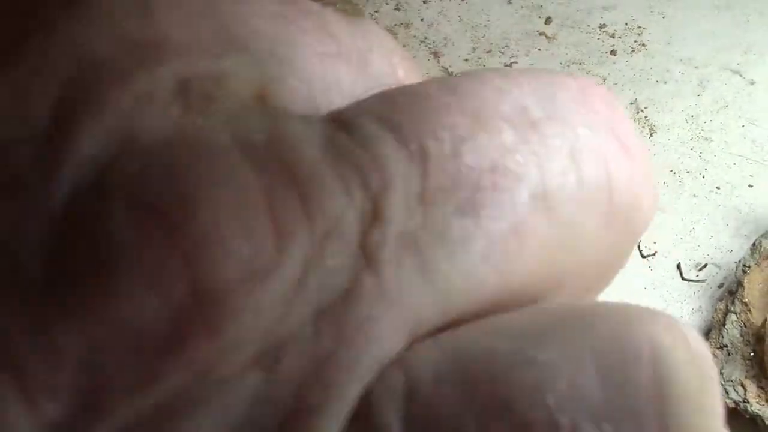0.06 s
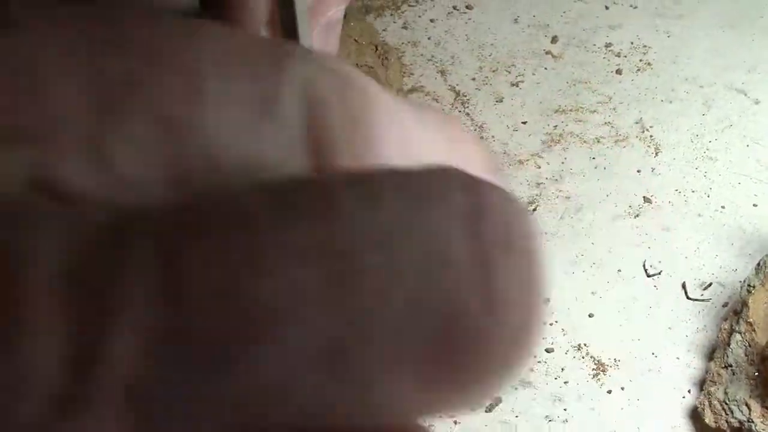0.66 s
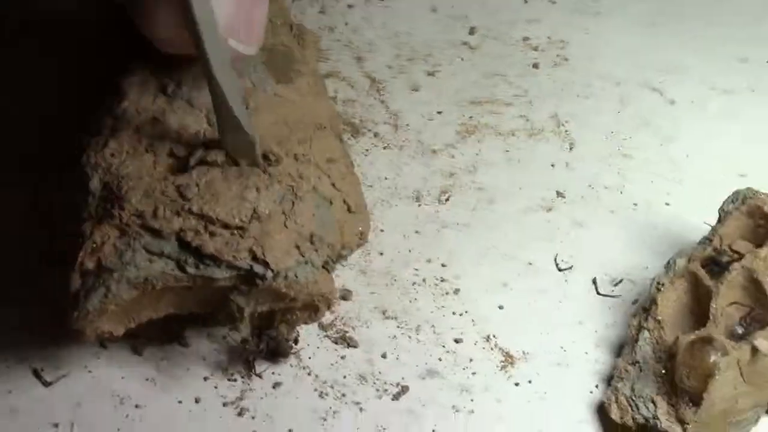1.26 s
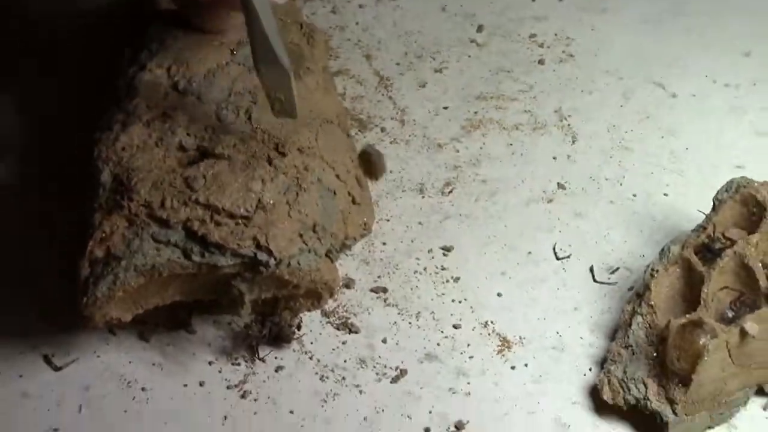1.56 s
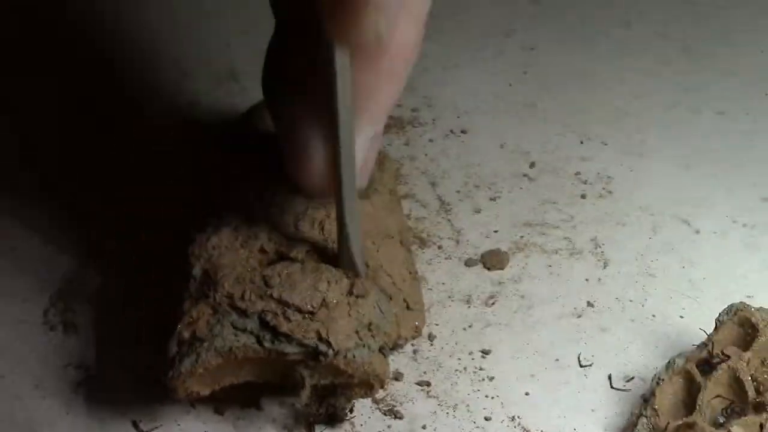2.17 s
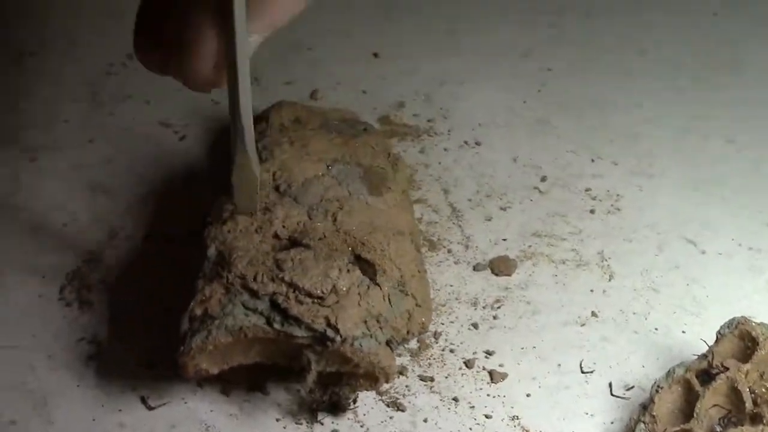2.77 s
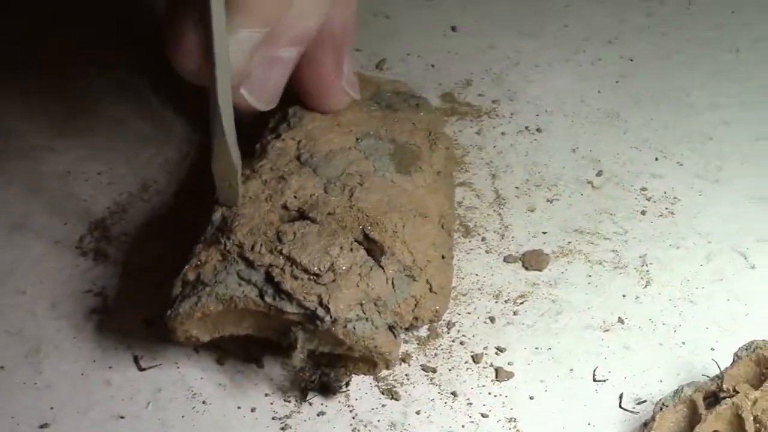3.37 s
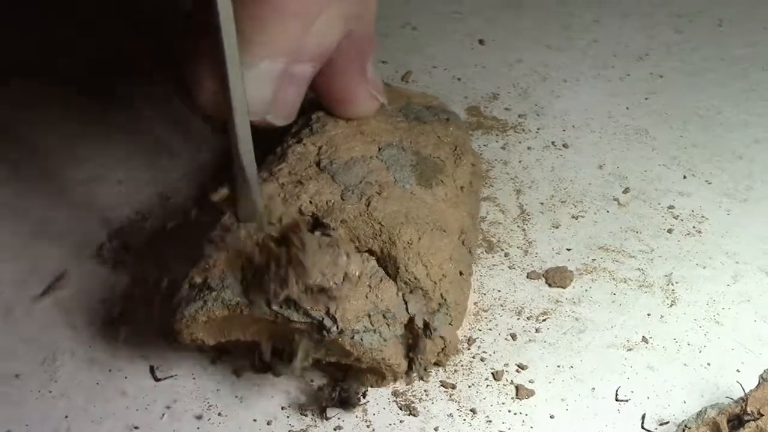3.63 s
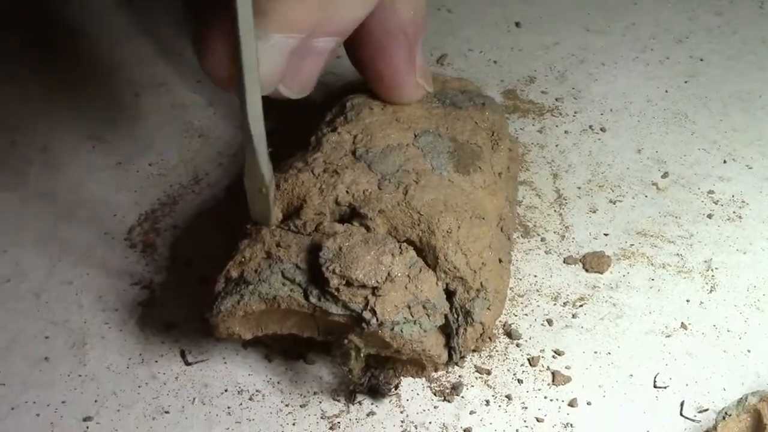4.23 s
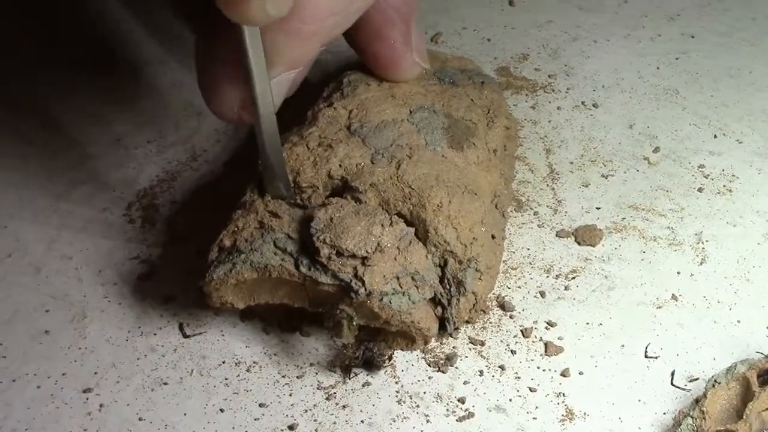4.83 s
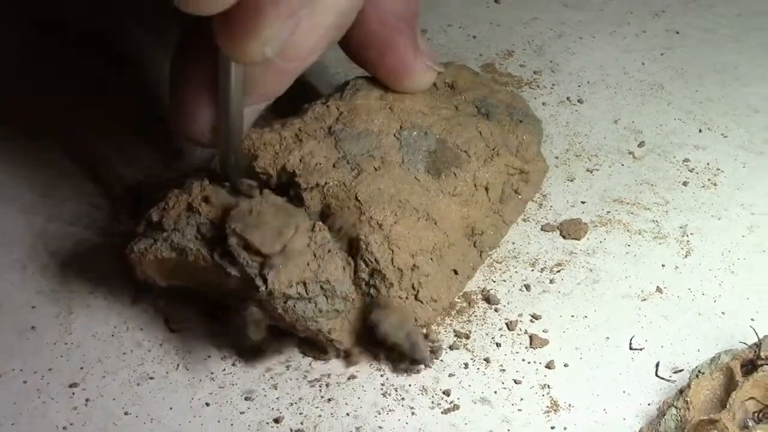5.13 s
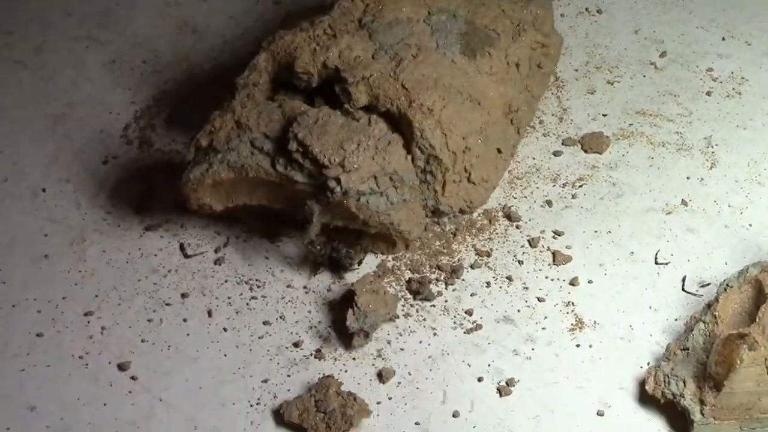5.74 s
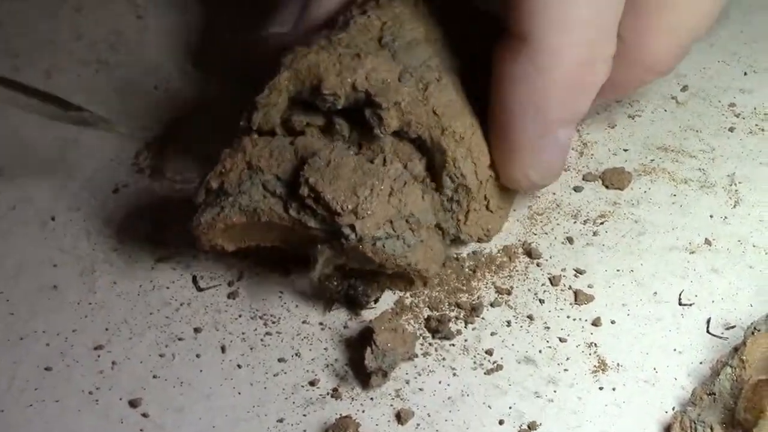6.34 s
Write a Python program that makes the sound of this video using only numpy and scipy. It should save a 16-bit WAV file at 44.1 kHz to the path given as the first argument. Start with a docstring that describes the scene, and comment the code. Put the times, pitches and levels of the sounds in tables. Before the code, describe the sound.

Close, crumbly cracks of dried clay being pried apart, with gritty scrapes, soft tabletop knocks and distant chirping birds.

```python
"""A dried mud nest cracks under a prying steel blade, close up on a table.
The clay gives way in showers of tiny fractures that hiss in the air and drum on the tabletop.
Blade and fingers scrape and rub; the nest knocks and drags over its own grit; crumbs drop.
Outside, a songbird sings and a second bird chips, over low rumble, hiss and a thin whine."""
import sys
import numpy as np
from scipy import signal
from scipy.fft import rfft, irfft
from scipy.io import wavfile
from scipy.ndimage import uniform_filter1d

SR = 44100
rng = np.random.default_rng(int(sys.argv[2]) if len(sys.argv) > 2 else 0)


def to_wav(s):
    """Save 16-bit WAV."""
    ch = np.atleast_2d(s).T  # columns
    pcm = np.round(np.clip(ch, -1, 1) * 32767)  # PCM
    wavfile.write(sys.argv[1], SR, pcm.astype(np.int16))


N = 282240

# clay giving way: start_s, strain_s, strain_db, tear_s, tear_db, drum_db, thud_db, thud_hz,
# settle_db, trickle_db
CLAY_BREAKS = [(1.330, 0.016, -25.5, .017, -20, -15, -3, 694, -6, -37.5),
               (2.327, 0.011, -36, .02, -16.5, -14, -6, 527, -17, -28.5),
               (3.729, 0.014, -42, .019, -20.5, -14, 3, 520, -5, -28),
               (4.795, 0.044, -35, 0.0035, -29, -15, -2.5, 460, -39, -73),
               (5.288, .041, -24, 0.0087, -25, -25.5, 4.5, 830, -15.5, -50)]
def breaks(clay, table, thud_after_s=0.00195, settle_hz=187):
    """Clay crackles under strain, then tears with a thud; the nest settles and debris trickles."""
    strains, fractures, thuds = [], [], []
    for (start_s, strain_s, strain_db, tear_s, tear_db, drum_db,
         thud_db, thud_hz, settle_db, trickle_db) in CLAY_BREAKS:
        strains.append((start_s - strain_s, strain_s, 0.031, strain_db, strain_db + 6.5))
        fractures.append((start_s, tear_s, 3.78 * tear_s, tear_db, drum_db))
        fractures.append((start_s + 0.045, 0.017, 0.19, trickle_db, trickle_db - 2))
        thuds.append((start_s + thud_after_s, thud_db, thud_hz))
        thuds.append((start_s + tear_s, settle_db, settle_hz))
    creak = showers(strains, clay, table, rate_hz=4200, spread_db=3, rise_s=0.014, clump_db=1.5)
    crackle = showers(fractures, clay, table, rate_hz=4200, spread_db=3, rise_s=0.005, clump_db=1.5)
    return creak + crackle + knocks(thuds, table)


def showers(rows, grit, table, rate_hz, spread_db, rise_s, clump_db):
    """Avalanches of tiny, uneven fractures; each snaps in the air and kicks the table."""
    out = np.zeros(N)
    for start_s, length_s, t60_s, grit_db, table_db in rows:
        t = clock(length_s + t60_s)
        chance, size_draw, polarity = rng.random((N // 10, 3))[:len(t)].T
        size = undb(-spread_db * np.log(0.02 + 0.98 * size_draw))
        clicks = (chance < rate_hz / SR) * size * np.sign(polarity - 0.5)
        clicks *= undb(clump_db * wobble(len(t), span=220))  # grains catch and let go in clumps
        envelope = np.minimum(t / rise_s, 1) ** 2 * fade(np.maximum(t - length_s, 0), t60_s)
        for response, db in (grit, grit_db), (table, table_db):
            sound = unit(signal.fftconvolve(clicks * envelope, response))
            add(out, start_s, sound * undb(db) * np.sqrt(np.sum(envelope ** 2)))
    return out


# clay fracture spectrum: freq_hz, level_db
CLAY_SPECTRUM = [(1060, -0.5), (1800, 8.5), (2160, 4), (2400, 0), (2900, -3.5), (4640, -2.5), (5650, -11),
                 (6770, -6), (10900, -6), (13100, -12.5), (15500, -27)]
# scraped grit spectrum: freq_hz, level_db
SAND_SPECTRUM = [(880, -35), (1500, 12.5), (2200, 2), (2420, 5), (3310, 2), (3990, 3), (4800, 1), (6250, 0),
                 (7160, 0), (7980, 1), (9420, -1.5), (12500, -1.5), (15500, -10)]
def grain(spectrum, scatter_db, size=1024):
    """One breaking grain: a minimum-phase snap, scattered between clay, hand and table."""
    cepstrum = irfft(np.log(gains(spectrum, size)))[:size // 2]
    cepstrum[1:] *= 2
    snap = irfft(np.exp(rfft(cepstrum, size)))
    paths = undb(scatter_db) * reflections(t60_s=0.037, build_s=0.00013)
    paths[0] += 1  # direct path
    return unit(signal.fftconvolve(paths, snap))


# tabletop loaded by the nest: freq_hz, resonance_db, t60_s
TABLETOP_MODES = [(86.2, 1.5, 0.22), (152, 6.5, .16), (211.5, 2, 0.14), (295.8, 1.5, 0.099),
                  (329, 3.5, 0.063), (370, -22, 0.068), (458, 1.5, 0.03), (531, -4, 0.038),
                  (575, 4.5, 0.051), (630, -19, 0.18), (724.5, 6.5, 0.049), (789, -14, 0.11),
                  (886, 4, 0.031), (1056, 1.5, 0.026), (1277, -7, 0.027), (1570, -11, 0.01),
                  (1700, -16, 0.018), (1950, -10, 0.02), (2450, -16.5, 0.012), (3190, -8, 0.0091)]
def tabletop(lag_rad=1.292):
    """Table impulse response; each mode lags the one below, so the crowded lows arrive late."""
    t = clock(0.3)
    return unit(sum(undb(db) / t60_s * np.sin(2 * np.pi * hz * t - lag_rad * k) * fade(t, t60_s)
                    for k, (hz, db, t60_s) in enumerate(TABLETOP_MODES)))


# scraping strokes: start_s, length_s, grit_db, table_db
SCRAPE_STROKES = [(0.0, 0.14, -57.5, -44.5), (0.66, 0.2, -58.5, -46.5), (1.498, 0.029, -48, -41.5),
                  (2.036, 0.093, -50.5, -58), (2.505, 0.15, -52, -49), (3.841, 0.016, -44, -36.5),
                  (4.427, 0.024, -49.5, -35.5), (4.871, 0.42, -63, -62), (5.157, 0.043, -40.5, -32.5),
                  (5.225, 0.018, -44, -39), (5.43, 0.01, -48, -40), (5.635, 0.016, -49.5, -37.5),
                  (6.327, 0.064, -48, -40)]
def scrapes(sand, table, t60_s=0.062):
    """Blade and fingers scrape over grit in sparse showers."""
    rows = with_decay(SCRAPE_STROKES, t60_s)
    return showers(rows, sand, table, rate_hz=1700, spread_db=5, rise_s=0.0076, clump_db=-1)


def specks(rate_hz=27, mean_db=-35.5, spread_db=2.5, tap_db=-12):
    """Crumb rows for specks shed at random while scraping."""
    rows = []
    for start_s, length_s, _, _ in SCRAPE_STROKES:
        offsets_s = np.cumsum(rng.exponential(size=32)) / rate_hz
        peaks_db = mean_db + spread_db * rng.standard_normal(size=32)
        rows += [(start_s + at, db, db + tap_db) for at, db in zip(offsets_s, peaks_db) if at < length_s]
    return rows


# nest base resonances: freq_hz, level_db, t60_s
BASE_MODES = [(3760, -4.5, 0.0033), (7040, -1, 0.0038), (9400, -10, 0.0034)]
# nest sliding: start_s, length_s, grit_db, table_db
NEST_DRAGS = [(0.155, 0.062, -40, -34), (5.477, 0.14, -36, -35)]
def drags(sand, table, t60_s=0.14):
    """Grains trapped under the sliding nest ring its hard, thin base."""
    t = np.arange(len(sand)) / SR
    ring = sum(undb(db) * unit(np.cos(2 * np.pi * hz * t) * fade(t, ring_s))
               for hz, db, ring_s in BASE_MODES)
    rasp = unit(sand + ring)
    rows = with_decay(NEST_DRAGS, t60_s)
    return showers(rows, rasp, table, rate_hz=3400, spread_db=3.6, rise_s=0.02, clump_db=1.8)


# nest bumping the table: start_s, peak_db, bounce_hz
NEST_KNOCKS = [(0.128, -32, 150), (0.518, -18, 430), (0.616, -32.5, 1900), (0.718, -20.5, 450),
               (0.769, -26.5, 580), (1.520, -27.5, 750), (2.637, -31.5, 870), (3.135, -22.5, 394),
               (3.186, -29, 254), (3.297, -28, 398), (3.594, -23.5, 190), (3.912, -27, 1320),
               (4.443, -22.5, 750), (4.591, -26, 416), (4.955, -31.5, 660), (5.603, -17, 524),
               (5.639, -21, 507), (5.664, -23.5, 350), (6.366, -20.5, 388)]
def knocks(rows, table, cycles=3.2):
    """The nest bounces on its contact and drives the table; a softer contact thuds lower."""
    out = np.zeros(N)
    t = clock(0.04)
    for start_s, peak_db, bounce_hz in rows:
        force = np.sin(2 * np.pi * bounce_hz * t) * fade(t, cycles / bounce_hz)
        thud = signal.fftconvolve(force, table)
        add(out, start_s, undb(peak_db) * thud / np.abs(thud).max())
    return out


# fingers and blade creeping on the nest: start_s, length_s, level_db
NEST_RUBS = [(2.893, 0.21, -49), (3.39, 0.047, -59), (3.559, 0.1, -37), (3.627, 0.13, -39),
             (5.587, 0.098, -35.5), (6.234, 0.077, -41)]
def rubs(table, cutoff_hz=220):
    """Soft stick-slip that reaches only the low table modes."""
    lowpass = signal.butter(2, cutoff_hz, fs=SR, output="sos")
    rumble = level(signal.sosfilt(lowpass, through(rng.standard_normal(N), table)), 0)
    envelope = np.zeros(N)
    for start_s, length_s, db in NEST_RUBS:
        add(envelope, start_s, undb(db) * np.sqrt(np.hanning(len(clock(length_s)))))
    return envelope * rumble


# crumbs snapping off or landing: start_s, grit_db, table_db
LARGE_CRUMBS = [(0.115, -27, -24.5), (0.191, -15, -21.5), (0.200, -19.5, -19), (0.246, -15.5, -22.5),
                (0.719, -30.5, -35), (1.336, -8.5, -13.5), (1.381, -11, -17.5), (1.751, -30, -57),
                (1.835, -37, -33), (1.875, -30.5, -49), (2.066, -27.5, -49), (2.867, -35, -43),
                (3.893, -21.5, -39), (4.796, -15, -44), (4.885, -36, -60), (4.998, -33, -36),
                (5.188, -18.5, -31), (5.228, -20, -23), (5.288, -10.5, -27), (5.445, -21, -44),
                (5.956, -31.5, -38), (6.368, -22, -56)]
def crumbs(grit, table):
    """Each crumb or speck gives one hard tick and taps the table."""
    out = np.zeros(N)
    for start_s, grit_db, table_db in LARGE_CRUMBS + specks():
        add(out, start_s, undb(grit_db) * grit / np.abs(grit).max())
        add(out, start_s, undb(table_db) * table / np.abs(table).max())
    return out


# song: start_s, length_s, level_db, pitch_ratio, kind
SONG_NOTES = [(1.072, 0.041, -42.5, 0.97, "fall"), (1.189, .068, -42.5, 1.054, "rise"),
              (1.263, 0.11, -40.5, 0.98, "trill"), (1.424, .05, -45, 1.0, "dip"),
              (1.539, 0.053, -45.5, .99, "rise"), (1.605, 0.066, -42.5, 0.96, "trill"),
              (2.308, 0.21, -41.5, 0.99, "buzz"), (2.517, .15, -49.5, 0.97, "warble"),
              (2.744, 0.18, -42, 1, "buzz"), (3.832, 0.021, -46.5, 1.3, "fall"),
              (3.88, 0.04, -45.5, .91, "sweep"), (3.956, 0.063, -39.5, 1.0, "scoop"),
              (4.152, 0.027, -42.5, 0.99, "sweep"), (4.184, 0.011, -42, 1.02, "fall"),
              (4.234, 0.046, -45, .98, "rise"), (4.338, 0.068, -38.5, 1.015, "cup")]
def songbird(distortion=7.5):
    """The two sides of a syrinx distort and modulate each other: faint overtones and sum tones."""
    song = np.zeros(N)
    for start_s, length_s, db, pitch_ratio, kind in SONG_NOTES:
        add(song, start_s, syllable(kind, length_s, db, pitch_ratio))
    highpass = signal.butter(2, 2500, "high", fs=SR, output="sos")
    return song + distortion * signal.sosfilt(highpass, song ** 2)


# pitch arcs by kind, one per voice: start_hz, middle_hz, end_hz
PITCH_ARCS = {"fall": [(3000, 2000, 1530)], "dip": [(2330, 1770, 1560)], "rise": [(1500, 1840, 1920)],
              "sweep": [(1620, 2150, 3200)], "trill": [(2600, 2930, 2750)], "buzz": [(3000, 2620, 1800)],
              "warble": [(2300, 2150, 1980)], "scoop": [(3560, 3040, 3080), (2720, 2320, 3200)],
              "cup": [(3220, 3060, 3330), (2640, 2420, 3350)]}
# pitch shake by kind: depth_hz, start_rate_hz, end_rate_hz
PITCH_TRILLS = {"trill": (290, 68, 68), "buzz": (280, 120, 40), "warble": (250, 38, 38)}
def syllable(kind, length_s, db, pitch_ratio, second_voice_db=-1.5, db_per_octave=10, rate_wander=0.181):
    """Each voice glides along an arc, louder when higher; a trill shakes it and makes it hoarse."""
    progress = clock(length_s) / length_s
    depth_hz, start_rate_hz, end_rate_hz = PITCH_TRILLS.get(kind, (0, 0, 0))
    rate_hz = start_rate_hz + (end_rate_hz - start_rate_hz) * progress
    rate_hz *= 1 + rate_wander * wobble(len(progress), span=300)
    trill_hz = depth_hz * np.cos(2 * np.pi * np.cumsum(rate_hz) / SR)
    hoarse = np.clip(depth_hz / 220, 0.15, 1)
    out = np.zeros(len(progress))
    for voice, points_hz in enumerate(PITCH_ARCS[kind]):
        arc_hz = pitch_ratio * np.polyval(np.polyfit([0, 0.5, 1], points_hz, 2), progress)
        effort = undb(db_per_octave * np.log2(arc_hz / arc_hz.mean()))
        out += effort * whistle(arc_hz + trill_hz, db + voice * second_voice_db, hoarse)
    return out


def whistle(pitch_hz, db, hoarse):
    """Near-pure tone with soft ends; hoarse (0-1) shakes pitch and level."""
    jitter = 1 + 0.05 * hoarse * wobble(len(pitch_hz), span=50)
    flutter = undb(2.5 * hoarse * wobble(len(pitch_hz), span=200))
    tone = np.sin(2 * np.pi * np.cumsum(pitch_hz * jitter) / SR)
    return level(tone * flutter * signal.windows.tukey(len(pitch_hz), 0.25), db)


# second bird: start_s
CHIP_TIMES = [0.324, 0.364, 0.854, 2.233, 3.455, 5.778, 5.939, 6.306]
def far_bird(centre_hz=3150, length_s=0.0071, fall_ratio=0.29):
    """A more distant bird gives brief falling chips."""
    out = np.zeros(N)
    pitch_hz = centre_hz * (1 - fall_ratio * (clock(length_s) / length_s - 0.5))
    for start_s in CHIP_TIMES:
        add(out, start_s, whistle(pitch_hz, db=-50, hoarse=0.68))
    return out


def birds(slap_s=0.059, slap_db=-16):
    """Both birds, with one distinct echo and diffuse ones from wall and yard."""
    calls = songbird() + far_bird()
    add(calls, slap_s, undb(slap_db) * calls)
    wall = undb(-11) * reverb(calls, t60_s=0.1, build_s=0.004, side_db=-4)
    yard = undb(-7) * reverb(calls, t60_s=1.0, build_s=0.0053, side_db=-24)
    return undb(1) * calls + wall + yard


# background noise spectrum: freq_hz, level_db
NOISE_SPECTRUM = [(12, -42), (20, -23), (44, -6.5), (90, -4.5), (129, -6), (282, -12.5), (306, -13),
                  (505, -15.5), (614, -16.5), (1160, -23), (1380, -19), (1980, -24.5), (3170, -27),
                  (3540, -28.5), (15500, -42.5)]
def ambience(noise_db=-45.5, whine_hz=11830, whine_db=-73):
    """Outdoor rumble, steady microphone hiss and a thin electronic whine."""
    shape = gains(NOISE_SPECTRUM, N)
    mid, side = (level(irfft(rfft(rng.standard_normal(N)) * shape, N), noise_db) for _ in range(2))
    t = clock(0.1)
    whine = through(rng.standard_normal(N), np.sin(2 * np.pi * whine_hz * t) * fade(t, t60_s=0.05))
    return stereo(mid, side, side_db=-27) + level(whine, whine_db)


def reverb(x, t60_s, build_s, side_db):
    """Diffuse stereo echoes of x."""
    mid, side = (through(x, reflections(t60_s, build_s)) for _ in range(2))
    return stereo(mid, side, side_db)


def reflections(t60_s, build_s):
    """Impulse response of echoes that build up and die away."""
    t = clock(t60_s)
    return unit(rng.standard_normal(len(t)) * fade(t, t60_s) * (1 - np.exp(-t / build_s)))


def stereo(mid, side, side_db):
    """Mid and side to left and right."""
    return mid + undb(side_db) * side * np.array([[1], [-1]])


def with_decay(strokes, t60_s):
    """Strokes to shower rows with a common decay."""
    return [(start_s, length_s, t60_s, *levels_db) for start_s, length_s, *levels_db in strokes]


def wobble(count, span):
    """Unit-rms random wander, changing over about span samples."""
    return level(uniform_filter1d(rng.standard_normal(N // 10), size=span), 0)[:count]


def gains(spectrum, size):
    """Spectrum table to FFT bin gains."""
    hz, db = np.transpose(spectrum)
    bins_hz = np.arange(size // 2 + 1) * SR / size
    return undb(np.interp(np.log(bins_hz + 1), np.log(hz), db))


def undb(db):
    """Decibels to gain."""
    return 10 ** (np.asarray(db) / 20)


def clock(length_s):
    """Sample times in seconds."""
    return np.arange(max(int(length_s * SR), 4)) / SR


def fade(t, t60_s):
    """Exponential decay, 60 dB down at t60_s."""
    return np.exp(-np.log(1000) * t / t60_s)


def level(x, db):
    """Scale to an rms level."""
    return x * undb(db) / np.sqrt(np.mean(x ** 2))


def unit(x):
    """Scale to unit energy."""
    return x / np.sqrt(np.sum(x ** 2))


def add(track, start_s, x):
    """Mix x into the track in place."""
    i = max(int(start_s * SR), 0)
    track[i:i + len(x)] += x[:max(len(track) - i, 0)]


def through(x, response):
    """Convolve and trim to N samples."""
    return signal.fftconvolve(x, response)[:N]


def scene():
    """Work on the table in a small room, birds beyond."""
    table = tabletop()
    clay = grain(CLAY_SPECTRUM, scatter_db=2)
    sand = grain(SAND_SPECTRUM, scatter_db=1.5)
    work = breaks(clay, table) + scrapes(sand, table) + drags(sand, table)
    work += knocks(NEST_KNOCKS, table) + rubs(table) + crumbs(sand, table)
    room = undb(-19.5) * reverb(work, t60_s=0.37, build_s=0.0083, side_db=-14)
    return work + room + birds() + ambience()


def record(dry):
    """Round the highest peaks; low-pass at 15.6 kHz."""
    rounded = dry / (1 + dry ** 6) ** (1 / 6)
    return signal.sosfilt(signal.ellip(10, 0.2, 80, 15600, fs=SR, output="sos"), rounded)


dry = scene()
out = record(dry)
to_wav(out)
```